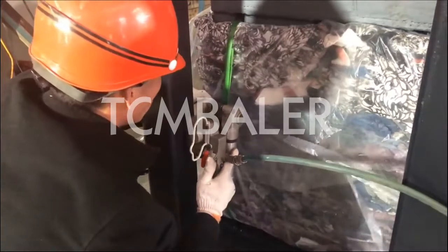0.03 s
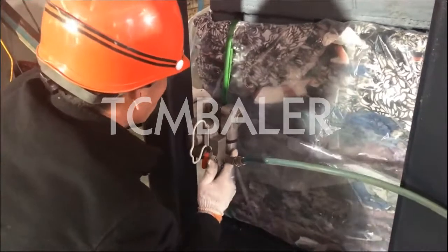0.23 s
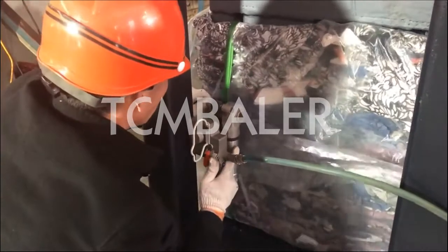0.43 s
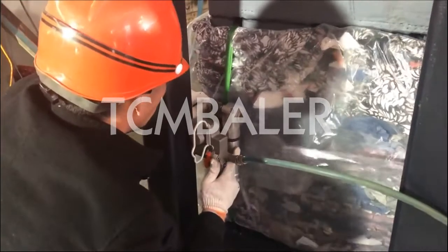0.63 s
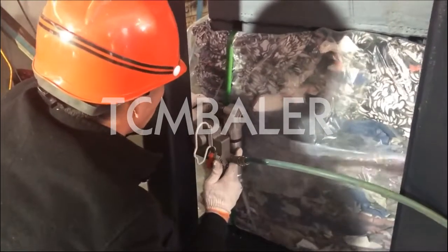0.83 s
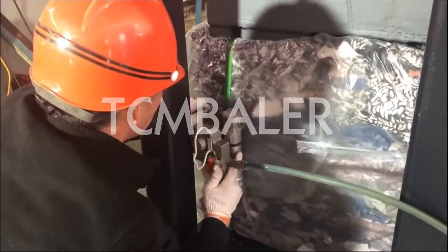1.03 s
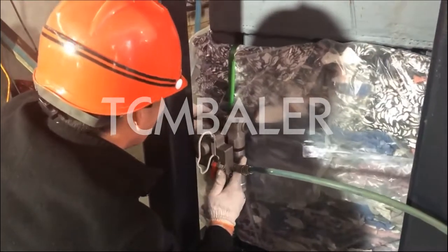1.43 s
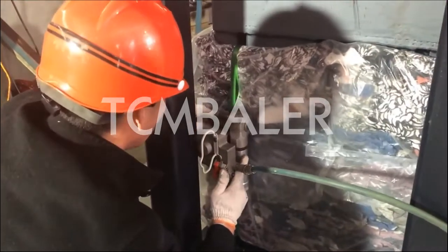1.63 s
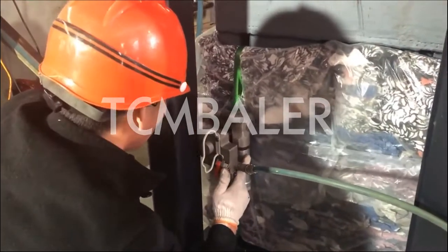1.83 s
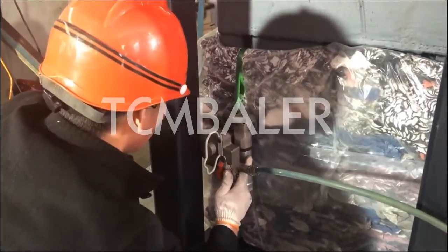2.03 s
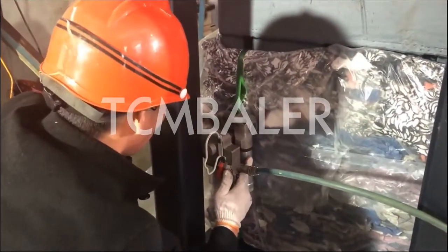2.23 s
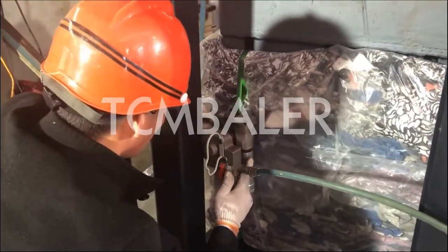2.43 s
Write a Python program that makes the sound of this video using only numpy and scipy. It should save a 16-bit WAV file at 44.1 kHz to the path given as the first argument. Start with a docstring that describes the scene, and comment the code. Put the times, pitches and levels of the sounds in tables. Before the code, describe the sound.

Hissing, whining air tool runs once at length, then twice briefly, in a factory hall.

```python
"""Factory hall, microphone close to a hose-fed air tool. Machinery hums in the background and plastic
wrap ticks. The trigger is then pulled three times, one long burst and two short. Each time air hisses
from the valve, the rotor chatters into motion and its vanes whine, sagging under load; the valve shuts
with a puff and the rotor coasts down. The hall rings on, and the gain control on the microphone,
pushed down by each burst, slowly lets the background back up."""
import sys
import numpy as np
from scipy import signal
from scipy.fft import rfft, irfft, next_fast_len
from scipy.io import wavfile
from scipy.ndimage import uniform_filter1d, map_coordinates

SR = 44100
rng = np.random.default_rng(int(sys.argv[2]) if len(sys.argv) > 2 else 0)


def wav_out(sig):
    """Save sig, one row per channel (or a flat mono array), as 16-bit PCM at SR to the path in sys.argv[1]."""
    wavfile.write(sys.argv[1], SR, np.round(np.clip(np.atleast_2d(sig).T, -1, 1) * 32767).astype(np.int16))


N = 110250

# Colour of the hall's background: freq_hz, level_db
HALL_COLOUR = [(15, -50), (25, -36), (76, -2), (195, -2.5), (309, -4.5), (363, 1), (394, -2), (754, -7.5),
               (936, -8.5), (1650, -13.5), (1890, -14.5), (2350, -3.5), (5140, -16), (5730, -19.5),
               (6210, -21.5), (7510, -26), (16000, -37)]
# Ticks of the plastic wrap: start_s, level_db
WRAP_TICKS = [(.069, -42), (0.0835, -17), (0.0878, -27), (.1195, -30)]
# Colour of a tick: freq_hz, level_db
TICK_COLOUR = [(300, -5), (2000, -1), (4000, 0), (6000, -3.5), (10000, -25), (16000, -28)]
# Trigger pulls: valve_opens_s, rotor_frees_s, valve_closes_s, hiss_db, whine_db
TRIGGER_PULLS = [(.248, 0.262, 1.331, 3, 2.5), (1.622, 1.637, 1.837, 2, 0.5),
                 (2.061, 2.081, 2.214, 2.5, 2.5)]
# Colour of the air spitting through the valve: freq_hz, level_db
SPIT_COLOUR = [(200, -32), (2500, -9), (3800, 3), (5500, -12), (8500, 9), (13000, -6), (16000, 3.5)]
# Colour of the exhaust jet: freq_hz, level_db
JET_COLOUR = [(100, -24), (500, -16), (900, -12), (1150, -14), (1450, -9.5), (1900, -7.5), (2400, -13),
              (2900, -11), (3500, 2.5), (3900, -5), (4400, -4), (4850, -2.5), (5500, -5), (6200, -2),
              (7100, -4), (8200, -4), (9500, -2.5), (12000, 1), (14000, 1.5), (15500, 3)]
# Colour of the vanes chattering at low speed: freq_hz, level_db
CHATTER_COLOUR = [(80, -30), (170, -11), (300, 2), (550, -5), (900, -1), (1450, 4), (2200, -6),
                  (3000, -6.5), (4500, -5), (9000, -11.5), (16000, -26)]
# Vane rate that the rotor settles to: time_s, pitch_hz
VANE_RATE = [(.3, 1069), (.42, 1063), (.68, 1023), (1.0, 983.9), (1.16, 957.8), (1.33, 929.4),
             (1.72, 948.7), (1.83, 931), (2.14, 926), (2.22, 903)]
# Colour of the whine on its way out of the exhaust and past the bale: freq_hz, level_db
WHINE_COLOUR = [(880, -22.5), (940, -18.5), (1000, -21), (1060, -25), (1810, -22.5), (1910, -17),
                (2020, -23), (2130, -25.5), (2700, -35.5), (3070, -35.5), (3150, -22), (3620, -21),
                (3820, -32), (3960, -17.5), (4120, -13), (4260, -29), (4530, -30), (4800, -21.5),
                (5090, -35.5), (5300, -24.5), (5440, -38), (5630, -31), (5820, -33.5), (5960, -20.5),
                (6110, -35), (6300, -30.5), (6700, -26.5), (7200, -29.5), (7650, -32.5), (8150, -34.5),
                (8500, -36), (9500, -45.5), (12000, -33)]
# Colour of the hiss that grows as load slows the rotor: freq_hz, level_db
LOAD_HISS_COLOUR = [(3000, -37), (6000, -27), (6600, -4.5), (7150, -1), (8200, -7), (9200, -14),
                    (15000, -38)]
# Colour of the coasting rotor in its housing: freq_hz, level_db
HOUSING_COLOUR = [(250, 0), (600, -1), (1000, -3), (1550, 5), (2000, -3), (2500, -12), (5000, -20)]
# Reverberation time of the hall: freq_hz, t60_s
HALL_DECAY = [(200, 0.94), (1000, 0.8), (3500, 0.99), (8000, 0.64), (15000, 0.51)]
# Stereo spread of hiss, room tone and echoes, nearly mono, wider in the top treble: freq_hz, side_db
STEREO_SPREAD = [(100, -32), (400, -37), (1000, -51), (3000, -50), (7000, -40), (9500, -14.5),
                 (15000, -10.5)]

HALL_DB, HUM_HZ, HUM_DB, TICK_S = -34.5, 73, -52, .0013
OPEN_S, VENT_S = .0031, .007  # the valve opens; the chamber empties
SPIT_DB, SPIT_S, PUFF_DB, PUFF_S = -9, .016, -9, .008  # first rush; the closing valve throttles the air
JET_DB, JET_PULSING, JET_FLUTTER_DB = -13, .31, 2.38
CHATTER_DB, CHATTER_S, COAST_RATTLE_DB = -7, .02, -29
KNOCKS_PER_S, KNOCK_DB = 220, 3.5  # lumpiness of the chatter
SPIN_UP_S, RUN_ON_S, COAST_S = .0215, .002, .054  # the rotor gains speed, holds it briefly, runs down
JITTER, SPUTTER, SPUTTER_DB = .0012, .05, 8  # unsteady speed; unsteady speed and level when slow
WHINE_DB, WAVER_DB, SHIMMER_DB = 6, 1.1, 1.5  # all orders waver; the upper ones also shimmer
BUILD_UP, BRIGHTEN = 2.0, .55  # exponent of the whine's growth with speed; extra per order
LOAD_HISS_DB, FULL_LOAD_HZ, LOAD_DB_PER_HZ = -19.5, 958, .06
COAST_DB, COAST_DB_PER_ORDER = -25, -3.5
STALL_SPEED = .25  # share of full speed where the vanes drop in
NEAR_WET_DB, NEAR_T60_S, HALL_WET_DB = -8.5, .22, -20.5
AGC_THRESHOLD_DB, AGC_WINDOW_S, AGC_RELEASE_DB_PER_S, TOP_HZ = -12, .0096, 9.5, 15780


def amp(db):
    """Decibels to gain."""
    return 10 ** (np.asarray(db) / 20)


def unit(x):
    """Scale to rms 1."""
    return x / np.sqrt(np.mean(x ** 2) + 1e-20)


def along(points, hz):
    """Read (freq_hz, value) points on a log frequency axis."""
    freqs, values = np.transpose(points)
    return np.interp(np.log(hz + 1), np.log(np.sort(freqs) + 1), values)


def wobble(rate):
    """A smooth random curve, rate knots a second."""
    return map_coordinates(rng.standard_normal(int(N * rate / SR) + 4), [np.arange(N) * rate / SR])


def filtered(x, response):
    """Filter x by a gain that depends on frequency."""
    size = next_fast_len(N + 8192)
    return irfft(rfft(x, size) * response(np.fft.rfftfreq(size, 1 / SR)), size)[..., :N]


def spread(pair):
    """Two unrelated signals to left and right: nearly mono, a little wider in the top treble."""
    mid, side = pair[0], filtered(pair[1], lambda hz: amp(along(STEREO_SPREAD, hz)))
    return np.array([mid + side, mid - side])


def noise(colour):
    """Coloured stereo noise of rms 1."""
    return unit(spread(filtered(rng.standard_normal((2, N)), lambda hz: amp(along(colour, hz)))))


def fade(t, start, life):
    """1 until start, then an exponential fall."""
    return np.exp(-np.maximum(t - start, 0) / life)


def machinery():
    """Room tone of the hall: steady noise and a wavering low hum."""
    phase = 2 * np.pi * HUM_HZ * np.arange(N) / SR + 0.5 * wobble(8)
    return amp(HALL_DB) * noise(HALL_COLOUR) + amp(HUM_DB + 2 * wobble(7.7)) * np.sin(phase)


def plastic_wrap():
    """Short dry ticks of plastic film near the microphone."""
    t = np.arange(N) / SR
    ticks = sum(amp(db) * (t >= start) * fade(t, start, TICK_S) for start, db in WRAP_TICKS)
    return noise(TICK_COLOUR) * ticks


def exhaust_jet(flow, phase, settled_hz):
    """Escaping air, chopped by the vanes; a second hiss grows as load slows the rotor."""
    chop = 1 + JET_PULSING * np.cos(phase)
    flutter = amp(JET_FLUTTER_DB * wobble(45.07))
    load = amp(LOAD_HISS_DB - LOAD_DB_PER_HZ * np.maximum(settled_hz - FULL_LOAD_HZ, 0))
    return flow * chop * flutter * (amp(JET_DB) * noise(JET_COLOUR) + load * noise(LOAD_HISS_COLOUR))


def vane_chatter(envelope):
    """The vanes rattle in uneven knocks as the rotor starts, and faintly as it coasts."""
    return envelope * unit(amp(KNOCK_DB * wobble(KNOCKS_PER_S))) * noise(CHATTER_COLOUR)


def rotor_whine(phase, hz, settled_hz, speed, drive, coast):
    """Vane pulses as a stack of orders: bright at full speed, dull when starting or coasting."""
    out = np.zeros(N)
    for order in np.arange(1, 13):
        level_db = WHINE_DB + along(WHINE_COLOUR, order * settled_hz) + WAVER_DB * wobble(24.92)
        level_db += SHIMMER_DB * np.log2(order) / 2 * wobble(70)
        level_db += SPUTTER_DB * np.clip(1 - speed, 0, 1) * wobble(KNOCKS_PER_S)
        growth = np.clip(speed, 1e-6, 1) ** (BUILD_UP + BRIGHTEN * (order - 1))
        driven = amp(level_db) * drive * growth
        coast_db = COAST_DB + COAST_DB_PER_ORDER * (order - 1) + along(HOUSING_COLOUR, order * hz)
        freewheeling = amp(coast_db + 2 * wobble(90)) * coast
        out += (driven + freewheeling) * np.sin(order * phase + rng.uniform(0, 2 * np.pi))
    return out


def air_tool():
    """Pressure from the valve feeds the jet and spins the rotor; returns (whine, rush of noise)."""
    t = np.arange(N) / SR
    speed, flow, drive, coast, spit, chatter = np.zeros((6, N))
    for opens, frees, closes, hiss_db, whine_db in TRIGGER_PULLS:
        pressure = (1 + np.tanh((t - opens) / (2 * OPEN_S))) / 2 * fade(t, closes, VENT_S)
        spin = (1 - fade(t, frees, SPIN_UP_S)) * fade(t, closes + RUN_ON_S, COAST_S)
        coasting = (1 - fade(t, closes, VENT_S)) * np.clip((spin - STALL_SPEED) / .08, 0, 1)
        speed += spin
        flow += amp(hiss_db) * pressure
        drive += amp(whine_db) * pressure * (t > frees)
        coast += coasting
        spit += amp(SPIT_DB) * pressure * fade(t, opens, SPIT_S)
        spit += amp(PUFF_DB) * np.exp(-((t - closes) / PUFF_S) ** 2)
        chatter += amp(CHATTER_DB) * np.clip((t - frees) / .006, 0, 1) * fade(t, frees, CHATTER_S)
        chatter += amp(COAST_RATTLE_DB) * coasting * spin
    settled_hz = np.interp(t, *np.transpose(VANE_RATE))
    unsteadiness = JITTER + SPUTTER * np.abs(1 - speed) * drive
    hz = settled_hz * speed * (1 + unsteadiness * wobble(150))
    phase = 2 * np.pi * np.cumsum(hz) / SR
    rush = exhaust_jet(flow, phase, settled_hz) + vane_chatter(chatter)
    whine = rotor_whine(phase, hz, settled_hz, speed, drive, coast)
    return whine, rush + spit * noise(SPIT_COLOUR)


def reflections(x, t60s):
    """Sound back off the walls: a diffuse tail in which each frequency dies at its own speed."""
    hz, t, spectra = signal.stft(rng.standard_normal((2, SR)), SR, nperseg=256)
    tail = signal.istft(spectra * amp(-60 * t / along(t60s, hz)[:, None]), SR, nperseg=256)[1]
    delayed = np.pad(x.mean(axis=0), (256, 0))[None]
    wet = signal.fftconvolve(delayed, tail / np.linalg.norm(tail[0]), axes=1)
    return spread(wet[:, :N])


def scene():
    """Close up, the whine arrives direct; air and ticks also scatter off the baler; the hall answers."""
    whine, rush = air_tool()
    noises = rush + plastic_wrap()
    near = whine + noises + amp(NEAR_WET_DB) * reflections(noises, [(1000, NEAR_T60_S)])
    return near + amp(HALL_WET_DB) * reflections(near, HALL_DECAY) + machinery()


def record(dry):
    """Behind the microphone: gain control that ducks fast and recovers slowly, then the band limit."""
    power = np.abs(uniform_filter1d(np.mean(dry ** 2, axis=0), int(AGC_WINDOW_S * SR)))
    over_db = np.maximum(10 * np.log10(power + 1e-12) - AGC_THRESHOLD_DB, 0)
    release_db = AGC_RELEASE_DB_PER_S * np.arange(N) / SR
    duck_db = uniform_filter1d(np.maximum.accumulate(over_db + release_db) - release_db, size=128)
    return filtered(dry * amp(-duck_db), lambda hz: hz < TOP_HZ)


dry = scene()
out = record(dry)
wav_out(out)
```